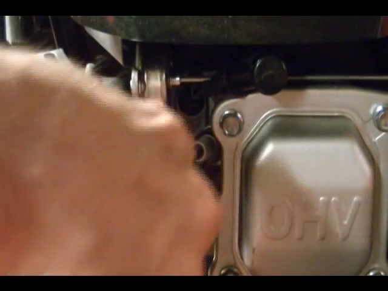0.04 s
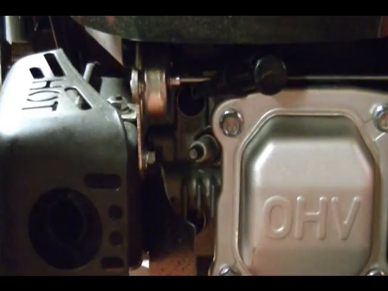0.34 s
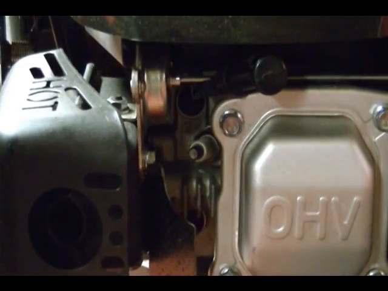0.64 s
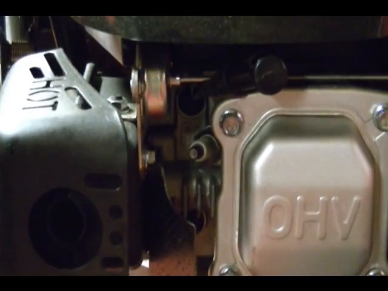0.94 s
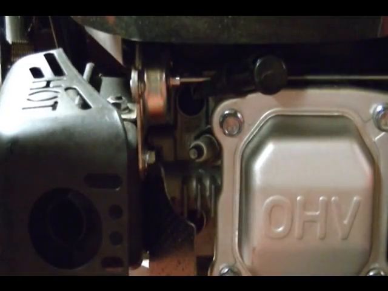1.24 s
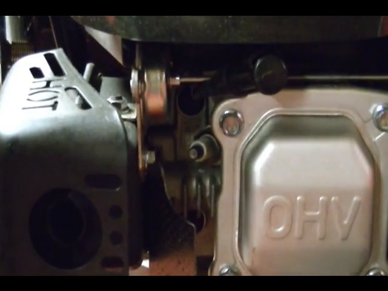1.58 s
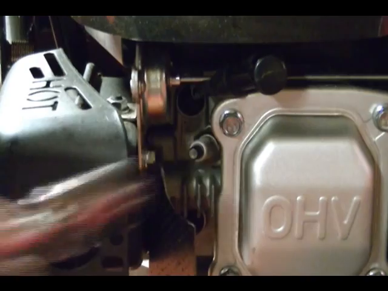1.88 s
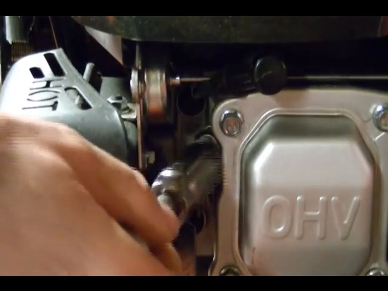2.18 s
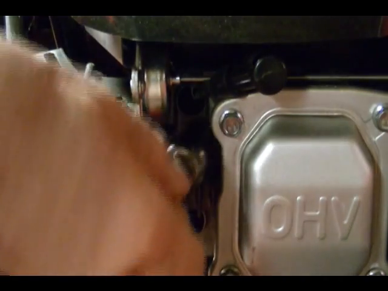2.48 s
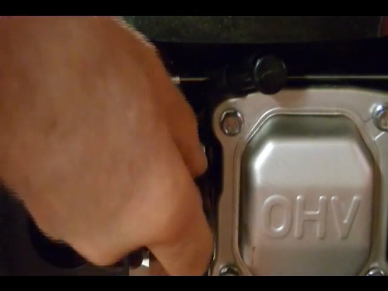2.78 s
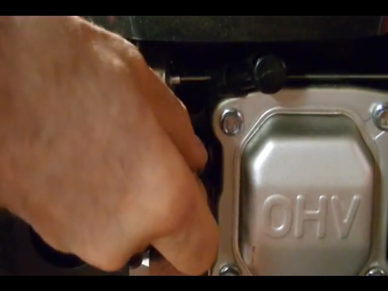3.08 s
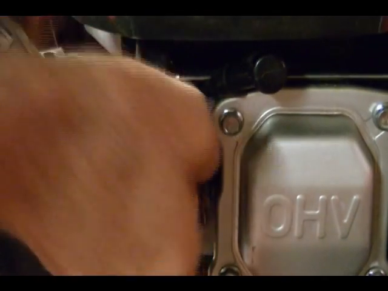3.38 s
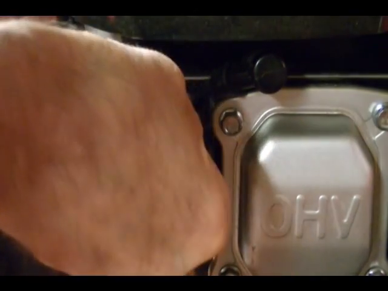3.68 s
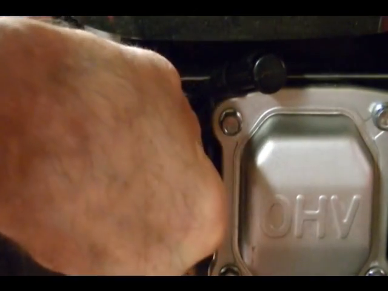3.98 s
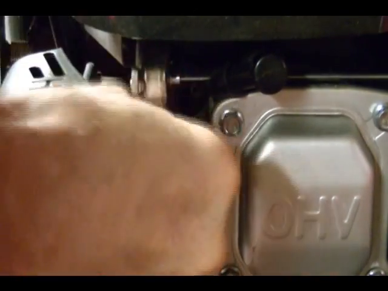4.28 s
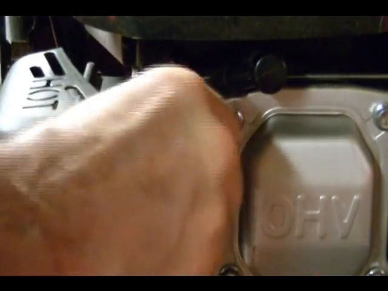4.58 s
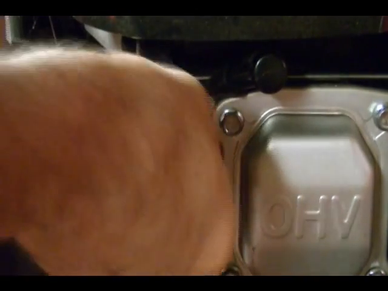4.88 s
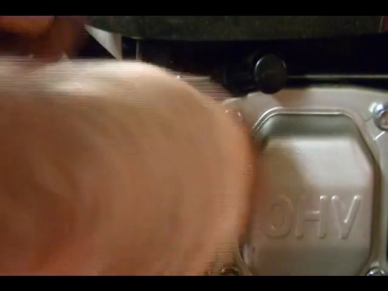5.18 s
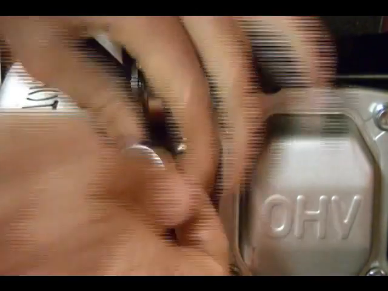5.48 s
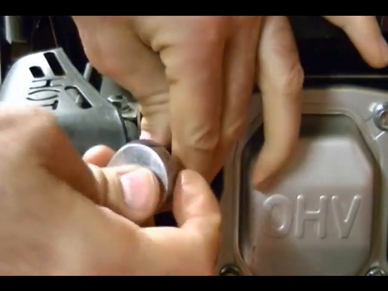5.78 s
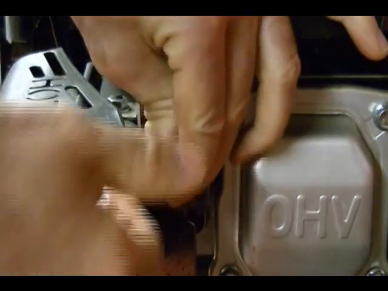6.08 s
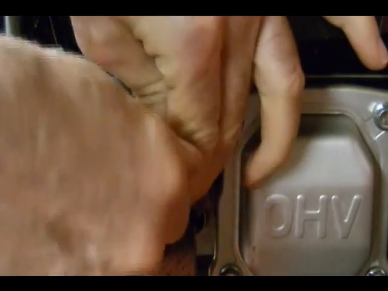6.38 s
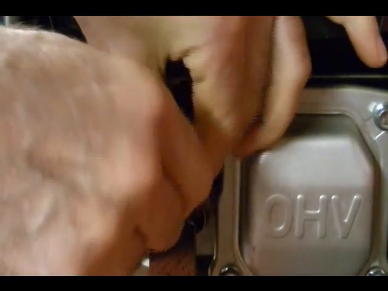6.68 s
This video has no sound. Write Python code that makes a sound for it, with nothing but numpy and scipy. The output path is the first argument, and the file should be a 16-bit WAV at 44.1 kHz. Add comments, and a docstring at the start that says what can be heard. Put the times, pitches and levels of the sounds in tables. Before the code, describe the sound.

Compressed air cuts off, then a socket wrench clinks, knocks and ratchets on a small engine in a quiet workshop.

```python
"""A blast of compressed air stops, and the air gun is laid on the bench of a small workshop.
Close by, a socket is pushed onto a small engine's spark plug; the plug breaks loose, the engine rocks,
the ratchet clicks and fingers slide along the tool, over a faint electrical hum and hiss.
The jet is turbulent noise in pipe resonances, the rubbing is grainy noise. Each blow is a burst of
chatter in an object's damped resonances; on most metal parts a few modes ring on."""
import sys
import numpy as np
from scipy import signal
from scipy.fft import rfft, irfft, next_fast_len
from scipy.io import wavfile

SR = 44100
rng = np.random.default_rng(int(sys.argv[2]) if len(sys.argv) > 2 else 0)


def store_wav(level_fs):
    """Save 16-bit WAV to argv[1]."""
    pcm = np.round(np.clip(np.atleast_2d(level_fs), -1, 1) * 32767)
    wavfile.write(sys.argv[1], SR, pcm.T.astype(np.int16))


N = 306054
TIME = np.arange(N) / SR

# Damped resonances of the bench and of sliding steel. Each row: frequency in Hz, gain in dB.
BENCH_BODY = [(50, -22.5), (160, 4.5), (300, -4.5), (480, 3), (900, -12.5), (1500, -13), (2800, -24.5),
              (5000, -30.5), (9000, -39.5), (15000, -56)]
STEEL_BODY = [(150, -21), (600, 3), (1050, -4), (1900, 5.5), (3700, -0.5), (6500, 3), (10000, -0.5),
              (13500, -8.5), (15500, -22)]
# Ringing modes of the engine. Each row: frequency in Hz, level in dB, T60 in seconds.
ENGINE_MODES = [(205, -18, 0.29), (375, -48, 0.18), (464, -13, 0.22), (493, -3, 0.26), (527.7, -11.5, 0.13),
                (584.2, 4, 0.16), (868, -21, 0.49), (1199, -11, 0.13), (1514, -14, 0.14), (1920, -22, 0.21)]


def undb(db):
    return 10 ** (np.asarray(db) / 20)


def unit_rms(x):
    return x / np.sqrt(np.mean(x ** 2) + 1e-30)


def fader(curve):
    """Gain over time from (s, dB) rows."""
    return undb(np.interp(TIME, *np.transpose(curve)))


def over_hz(points, hz):
    """Interpolate (Hz, value) rows on a log-frequency axis."""
    point_hz, value = np.transpose(points)
    return np.interp(np.log(hz + 1), np.log(point_hz), value)


def colour(x, points, peaks=()):
    """Minimum-phase filter: a broad spectrum plus resonant peaks."""
    size = 2 * next_fast_len(len(x))
    hz = np.arange(size // 2 + 1) * SR / size
    peaks_db = sum(db / (1 + (2 * (hz - centre) / width) ** 2) for centre, width, db in peaks)
    cepstrum = irfft(np.log(undb(over_hz(points, hz) + peaks_db)))
    cepstrum[1:size // 2] *= 2
    cepstrum[size // 2 + 1:] = 0
    return irfft(rfft(x, size) * np.exp(rfft(cepstrum)))[:len(x)]


def three_bands(x):
    """Split into bass, middle and treble."""
    # Each row: lower edge in Hz, upper edge in Hz.
    edges_hz = [(100, 900), (900, 4000), (4000, 15000)]
    low, middle, high = edges_hz
    cuts = (low[1], "lowpass"), (middle, "bandpass"), (high[0], "highpass")
    return [signal.sosfilt(signal.butter(3, hz, kind, fs=SR, output="sos"), x) for hz, kind in cuts]


def blows(hits, body, modes=(), *, rise_s, chatter_s, grit_db, bass_db, treble_db, ring_db=0):
    """Contacts build, chatter and die in a body; modes ring on. Hardness trades bass for treble."""
    t = np.arange(SR // 2) / SR
    attack = int(0.03 * SR)
    push = 1 - np.exp(-t / rise_s)
    out = np.zeros(N + len(t))
    for start_s, level_db, hardness_db, decay_s in hits:
        # uneven micro-impacts, about one per ms
        grit = undb(grit_db * np.repeat(rng.standard_normal(len(t)), 40)[:len(t)])
        decay = np.exp(-np.maximum(t - chatter_s, 0) / decay_s)
        hit = colour(push * grit * rng.standard_normal(len(t)) * decay, body)
        hit /= hit[:attack].std()
        # spot and grip vary, so the modes share each blow differently
        ring = np.zeros(len(t))
        for hz, db, t60_s in modes:
            share, detune, sign = rng.standard_normal(3)
            tone = np.sign(sign) * np.sin(2 * np.pi * hz * (1 + 0.003 * detune) * t)
            ring += tone * undb(db + 3 * share - 60 * t / t60_s)
        hit += undb(ring_db) * push * ring / (ring[:attack].std() + 1e-12)
        band_db = level_db + np.array([bass_db - hardness_db, 0, treble_db + hardness_db])
        start = int(start_s * SR)
        for db, band in zip(band_db, three_bands(hit)):
            out[start:start + len(t)] += undb(db) * band / band[:attack].std()
    return out[:N]


def lasting(hits, decay_s):
    """Append one contact decay time to every row."""
    return [(*row, decay_s) for row in hits]


def hum_and_hiss(hiss_db, hum_db, waver_rad):
    """Mains buzz with slightly wavering lines, over hiss with a thin whistle."""
    # Each row: time in seconds, gain in dB.
    swell = [(0, -21.5), (.7, -16.5), (1.15, -0.5), (1.6, -6.5), (2.08, 1), (6.9, 3)]
    # Each row: frequency in Hz, relative level in dB.
    hiss_spectrum = [(30, -33.5), (70, -9.5), (135, -1), (220, -9), (400, -9.5), (700, -14.5),
                     (1200, -15.5), (2400, -18.5), (3500, -20), (5500, -22), (8300, -26), (10500, -26),
                     (13000, -30.5), (15500, -38)]
    hum_lines = [(120, -93), (137, -72), (240, -76), (360, -73), (480, -79), (600, -77), (840, -75.5),
                 (1080, -81), (1560, -82), (1800, -75), (2400, -87), (3000, -82)]
    # Each row: centre in Hz, width in Hz, boost in dB.
    whistle = [(3590, 150, 8), (7140, 450, 12)]
    hiss = unit_rms(colour(rng.standard_normal(N), hiss_spectrum, whistle))
    knots_s = np.linspace(0, TIME[-1], 40)
    hum = np.zeros(N)
    for hz, db in hum_lines:
        drift_rad = waver_rad * np.interp(TIME, knots_s, rng.standard_normal(len(knots_s)))
        hum += undb(db) * np.sqrt(2) * np.sin(2 * np.pi * (hz * TIME + rng.random()) + drift_rad)
    return (undb(hiss_db) * hiss + undb(hum_db) * hum) * fader(swell)


def room_echo(x, build_s):
    """Diffuse echo of a small room; the treble dies first."""
    # Each row: frequency in Hz, T60 in seconds.
    reverb_times = [(150, 0.84), (530, 0.68), (1400, 0.62), (3700, 0.46), (9700, 0.25), (15000, 0.15)]
    t = np.arange(SR * 3 // 4) / SR
    hz, frame_s, cells = signal.stft(rng.standard_normal(len(t)), SR, nperseg=256)
    fade = undb(-60 * frame_s / over_hz(reverb_times, hz)[:, None])
    build = 1 - np.exp(-(t / build_s) ** 2)
    tail = signal.istft(cells * fade)[1][:len(t)] * build
    return signal.fftconvolve(x, tail / np.linalg.norm(tail))[:N]


def tool_rattle(taps_per_spell, scatter_db):
    """The worked tool taps lightly and at random in its play."""
    # Each row: start in seconds, end in seconds, level in dB.
    spells = [(2.855, 3.803, -71.5), (4.5, 4.8, -64.5), (4.961, 5.204, -64.5)]
    taps = []
    for start_s, end_s, db in spells:
        for tap_s in rng.uniform(start_s, end_s, taps_per_spell):
            offset_db, hardness_db = rng.normal(0, scatter_db, 2)
            taps.append((tap_s, db + offset_db, hardness_db))
    return blows(lasting(taps, decay_s=0.0043), STEEL_BODY,
                 rise_s=0.00089, chatter_s=0.00096, grit_db=7, bass_db=6, treble_db=-4)


def finger_rub(grain_db):
    """Skin catches and slips on steel in tiny grains; each stroke swells and fades."""
    # Each row: fastest moment in seconds, level in dB, half length in seconds.
    strokes = [(3.522, -60.5, 0.084), (5.408, -55, 0.063), (5.523, -45.5, 0.037), (5.627, -53.5, .085)]
    # Each row: frequency in Hz, gain in dB.
    spectrum = [(200, -10), (550, -0.5), (1200, -6.5), (1900, -1), (3200, -7.5), (4800, -2), (9500, -9.5),
                (12500, -12), (15500, -26)]
    grip = undb(grain_db * np.repeat(rng.standard_normal(N // 64 + 1), 64)[:N])
    speed = sum(undb(db) * np.exp(-((TIME - peak_s) / half_s) ** 2) for peak_s, db, half_s in strokes)
    return unit_rms(colour(rng.standard_normal(N) * grip, spectrum)) * speed


def socket_jingle():
    """The loose socket jingles in the fingers."""
    # Each row: start in seconds, level in dB, hardness in dB.
    hits = [(6.335, -66, 14), (6.795, -48.5, -5.5)]
    # Each row: frequency in Hz, level in dB, T60 in seconds.
    modes = [(2160, 1, 0.51), (2290, 1, 0.39), (2700, -6.5, 0.5), (3246, -10, 0.33), (4110, -5, 0.14),
             (4317, -7.5, 0.12)]
    return blows(lasting(hits, decay_s=0.022), STEEL_BODY, modes, ring_db=10.5,
                 rise_s=0.0053, chatter_s=0.008, grit_db=2, bass_db=-9, treble_db=-6)


def bench_bumps():
    """The air gun is set down; the bench thuds without ringing."""
    # Each row: start in seconds, level in dB, hardness in dB.
    hits = [(0.758, -58, 2.5), (0.868, -39.5, -1)]
    return blows(lasting(hits, decay_s=0.011), BENCH_BODY,
                 rise_s=0.00091, chatter_s=0.0016, grit_db=-1, bass_db=-2, treble_db=-6.5)


def hose_drag():
    """The hose drags over the bench in jerks."""
    # Each row: start in seconds, level in dB, hardness in dB.
    jerks = [(1.272, -49.5, -5), (1.299, -40.5, 2), (1.337, -38.5, 5), (1.38, -45.5, 16.5)]
    return blows(lasting(jerks, decay_s=0.042), BENCH_BODY,
                 rise_s=0.00051, chatter_s=0.0014, grit_db=3.5, bass_db=-4, treble_db=-23)


def gun_drop():
    """The air gun drops with a clack and rings."""
    # Each row: start in seconds, level in dB, hardness in dB.
    hits = [(1.42, -25.5, 0.5)]
    # Each row: frequency in Hz, gain in dB.
    body = [(30, -14), (130, -18), (310, -1.5), (650, -0.5), (1100, -12), (2000, -10.5), (3000, -9.5),
            (4100, -7.5), (7000, -12.5), (10000, -19.5), (15000, -34)]
    # Each row: frequency in Hz, level in dB, T60 in seconds.
    modes = [(2820, -8, 0.3), (4875, -21.5, 0.26), (5500, -1, 0.17), (6440, 8, 0.16), (6300, -5.5, 0.29),
             (7730, -3, 0.24)]
    return blows(lasting(hits, decay_s=0.0023), body, modes, ring_db=-15.5,
                 rise_s=0.00031, chatter_s=0.00051, grit_db=3.5, bass_db=-9.5, treble_db=-8.5)


def air_jet(shut_s, fall_db_per_s):
    """Turbulent air hisses through the nozzle until the valve snaps shut."""
    # Each row: time in seconds, level in dB.
    flow = [(0.0, -22), (0.044, -25), (0.082, -22), (0.09, -24)]
    # Each row: frequency in Hz, gain in dB.
    spectrum = [(60, -54.5), (200, -30), (420, -26.5), (600, -19), (900, -17), (1350, -17), (2100, -11),
                (2700, -8), (3400, -11), (4900, -2.5), (7000, -4.5), (11000, -8), (13000, -13.5),
                (15500, -31)]
    # Pipe resonances of nozzle and blown cavity. Each row: centre in Hz, width in Hz, boost in dB.
    peaks = [(590, 38, 10), (880, 140, 7.5), (1870, 200, 7), (2630, 290, 3), (4950, 740, 0.5)]
    turbulence = rng.standard_normal(N)
    valve = undb(-fall_db_per_s * np.clip(TIME - shut_s, 0, 0.5))
    steady_rms = colour(turbulence, spectrum, peaks).std()
    return colour(turbulence * fader(flow) * valve, spectrum, peaks) / steady_rms


def steel_scrapes():
    """Steel slides briefly on steel."""
    # Each row: start in seconds, level in dB, hardness in dB, decay in seconds.
    slides = [(2.712, -44.5, -9.5, 0.062), (3.192, -53, 1.5, .009), (3.228, -62, 15, 0.014),
              (4.109, -44.5, 11, 0.012), (4.1535, -35, -11.5, 0.0047), (4.281, -48, -1, 0.015),
              (5.02, -44.5, 5.5, 0.0058), (5.03, -42, -8, 0.016), (5.2228, -38.5, 2, 0.0096),
              (6.534, -58.5, -8, 0.0025)]
    return blows(slides, STEEL_BODY,
                 rise_s=0.0012, chatter_s=0.0037, grit_db=-4, bass_db=-9.5, treble_db=-6)


def hand_thump():
    """A hand thumps the engine: slow contact, dull body."""
    # Each row: start in seconds, level in dB, hardness in dB.
    hits = [(6.114, -33, 0.5)]
    # Each row: frequency in Hz, gain in dB.
    body = [(80, -50), (140, -14), (200, -1), (270, -5), (350, 2.5), (450, 1.5), (590, -3), (690, -12.5),
            (850, -5), (1100, -12), (1550, -8), (2200, -16), (3000, -23.5), (4500, -40), (12000, -52)]
    return blows(lasting(hits, decay_s=0.0079), body, ENGINE_MODES, ring_db=-3,
                 rise_s=0.0045, chatter_s=0.0036, grit_db=3, bass_db=9, treble_db=-13)


def engine_rocking(bounces, gap_s, soften_db):
    """The engine knocks on the bench and bounces evenly, weaker and duller each time."""
    # Each row: start in seconds, level in dB, hardness in dB, loss per bounce in dB.
    knocks = [(2.7755, -40, 0.5, 4), (2.967, -64, 2, 17), (3.179, -54.5, 8, 18), (3.288, -73.5, -14.5, 6),
              (3.574, -60, -4.5, 33), (3.711, -66, -1, 16), (4.102, -51.5, -13.5, 0.5), (4.132, -39, 3, 10),
              (4.153, -32, 6, 1), (4.22, -40, -4.5, 1.5), (4.2455, -34.5, 2.5, 10.5),
              (4.301, -49, -11, 7.5), (4.355, -50.5, -1.5, 9), (4.428, -42.5, 0.5, 6),
              (6.636, -58, -7.5, 20), (6.788, -57, -3.5, 2.5)]
    # Each row: frequency in Hz, gain in dB.
    body = [(25, -59), (60, -31), (120, -15.5), (220, -5.5), (380, -7.5), (480, -1.5), (590, -3), (730, -9),
            (1150, -12.5), (1800, -20.5), (2900, -22), (3400, -38), (5200, -35), (6500, -50), (15000, -66)]
    hits = [(start_s + k * gap_s, db - k * loss_db, hardness_db - k * soften_db)
            for start_s, db, hardness_db, loss_db in knocks for k in range(1 + bounces)]
    return blows(lasting(hits, decay_s=0.0063), body, ENGINE_MODES, ring_db=-1.5,
                 rise_s=0.00033, chatter_s=0.0042, grit_db=0.5, bass_db=0.8, treble_db=-26.5)


def ratchet_clicks():
    """The pawl and small steel parts tick, with a short, high ring."""
    # Each row: start in seconds, level in dB, hardness in dB.
    ticks = [(1.253, -49, 1), (1.643, -62.5, -9), (4.6365, -54.5, 0.5), (4.757, -36, 1),
             (4.8065, -36.5, -1.5), (4.841, -39, 1.5), (5.153, -58.5, 0), (5.2517, -34.5, -1),
             (5.3312, -44, 9.5), (5.868, -53, -4.5), (5.98, -59.5, 4.5), (6.034, -65.5, 13),
             (6.065, -65, 1)]
    # Each row: frequency in Hz, gain in dB.
    body = [(150, -30.5), (600, -11), (1100, -15.5), (2100, -3.5), (3500, -6.5), (4700, -1.5), (6300, 8),
            (7700, 17), (9500, 3), (10700, 6), (11800, 13.5), (13000, 1.5), (15500, -8)]
    # Each row: frequency in Hz, level in dB, T60 in seconds.
    modes = [(6165, -3, .09), (7650, -1, .09), (8220, 2, .034), (11300, -12, .1), (11550, -7, .12),
             (11900, -2, .11), (12080, -4, .12), (12260, -1, .15)]
    return blows(lasting(ticks, decay_s=0.0027), body, modes, ring_db=-10.5,
                 rise_s=0.00044, chatter_s=0.0025, grit_db=5.5, bass_db=-14, treble_db=0.5)


def socket_on_head():
    """The socket clinks against the cylinder head."""
    # Each row: start in seconds, level in dB, hardness in dB.
    hits = [(2.2212, -30, -2.5), (2.2343, -31, 0), (2.3135, -57.5, 12.5)]
    # Each row: frequency in Hz, gain in dB.
    body = [(60, -25), (220, -6.5), (480, -9), (600, 5), (900, -6.5), (1400, -1), (2300, -2.5), (3700, -17),
            (4800, -10.5), (6000, -20), (9000, -27), (13400, -36), (15500, -46)]
    # Each row: frequency in Hz, level in dB, T60 in seconds.
    modes = [(2180, -11, 0.13), (2720, 3, 0.21), (4450, -14, .1), (4700, -3, 0.22), (4500, -13, 0.13),
             (4829, 9, 0.2), (5200, -7, 0.38), (5350, -20, .1), (7725, -14, .12), (13110, -18, 0.074)]
    return blows(lasting(hits, decay_s=0.0065), body, modes, ring_db=-17,
                 rise_s=0.00021, chatter_s=0.00071, grit_db=6, bass_db=-9.5, treble_db=-1.3)


def socket_on_plug():
    """The socket seats on the plug and shifts on it, ringing near 2.3 kHz."""
    # Each row: start in seconds, level in dB, hardness in dB.
    hits = [(2.5132, -27.5, 13.5), (2.566, -34, 7.5), (2.624, -50.5, -12.5), (2.762, -43, -2),
            (6.893, -50.5, -0.5)]
    # Each row: frequency in Hz, gain in dB.
    body = [(150, -56), (410, 7), (950, -1.5), (1200, 5), (1900, 5.5), (2300, 22), (2700, 8), (4300, -3),
            (7000, -11.5), (10000, -22.5), (13400, -24), (15500, -45)]
    # Each row: frequency in Hz, level in dB, T60 in seconds.
    modes = [(2277, 16, 0.18), (2300, 2, 0.2), (2546, -19, .25), (3790, -2, 0.22), (4100, 0, 0.16),
             (4650, 0, 0.17), (6277, -20, .25), (6804, -30, 0.32), (13360, -24, 0.19)]
    return blows(lasting(hits, decay_s=0.0092), body, modes, ring_db=-14.5,
                 rise_s=0.00037, chatter_s=0.0037, grit_db=3, bass_db=-7.5, treble_db=-17.5)


def scene():
    """Direct sound, wall echo and background in mono; the bench is further off and wetter."""
    sources = [  # Each row: sound, room send in dB.
        (air_jet(shut_s=0.092, fall_db_per_s=2801), -15.5),
        (bench_bumps(), -5),
        (hose_drag(), -8.5),
        (gun_drop(), -10.5),
        (socket_on_head(), -13.5),
        (socket_on_plug(), -10.5),
        (engine_rocking(bounces=2, gap_s=0.012, soften_db=2.5), -13.5),
        (hand_thump(), -14),
        (ratchet_clicks(), -13.5),
        (steel_scrapes(), -14),
        (socket_jingle(), -11),
        (tool_rattle(taps_per_spell=6, scatter_db=1.3), -1.5),
        (finger_rub(grain_db=1.5), -10),
    ]
    direct = sum(sound for sound, _ in sources)
    echo = room_echo(sum(sound * undb(send_db) for sound, send_db in sources), build_s=0.0013)
    return (direct + echo + hum_and_hiss(hiss_db=-62.5, hum_db=0.5, waver_rad=0.3))[None]


def record(dry):
    """Round the highest peaks, then low-pass at 16 kHz."""
    ceiling = undb(-8)
    lowpass = signal.ellip(8, 0.2, 70, 16000, fs=SR, output="sos")
    return signal.sosfilt(lowpass, ceiling * np.tanh(dry / ceiling))


dry = scene()
out = record(dry)
store_wav(out)
```